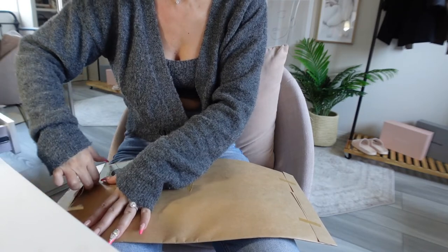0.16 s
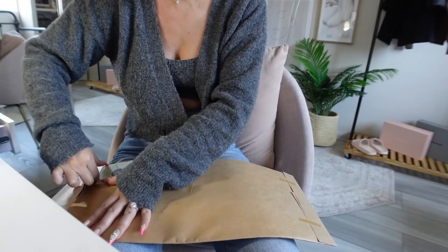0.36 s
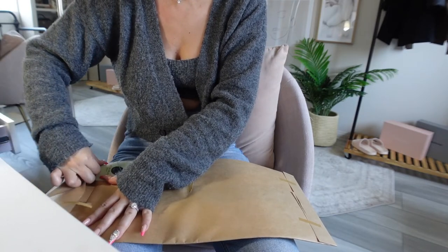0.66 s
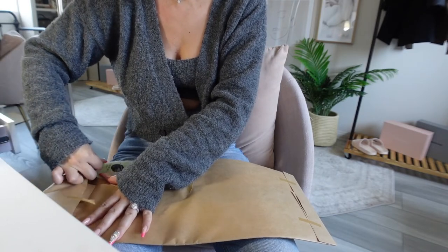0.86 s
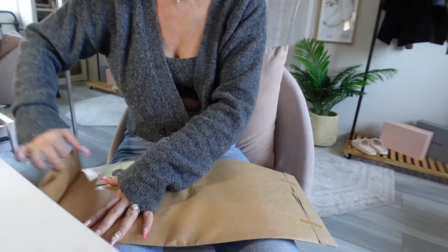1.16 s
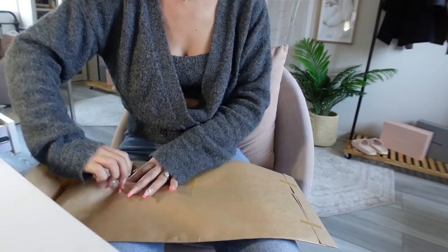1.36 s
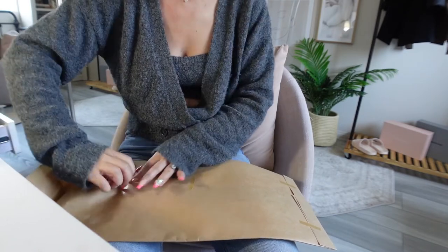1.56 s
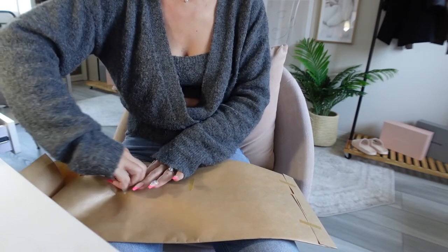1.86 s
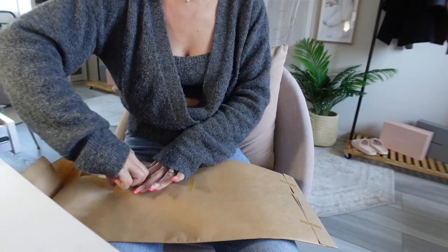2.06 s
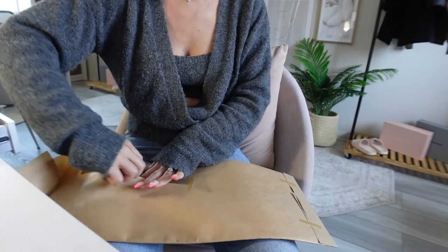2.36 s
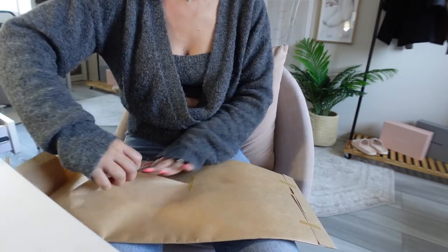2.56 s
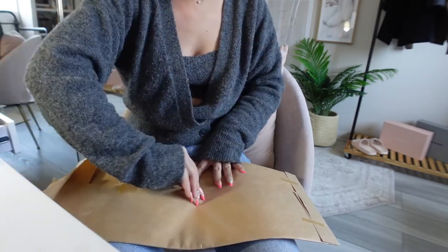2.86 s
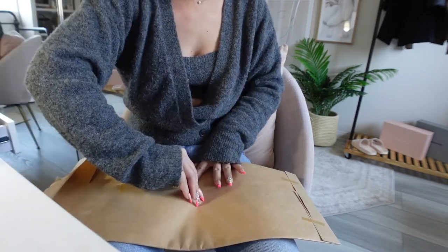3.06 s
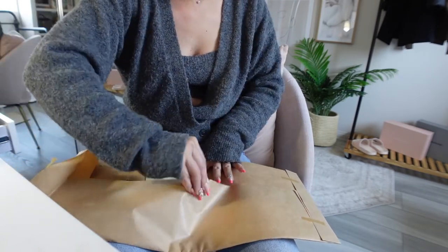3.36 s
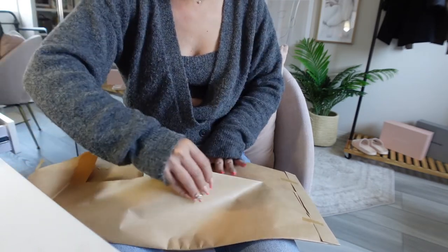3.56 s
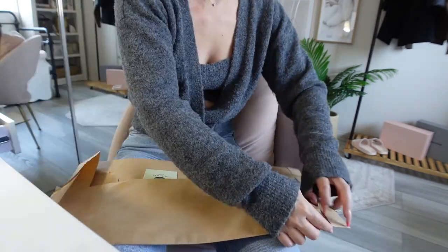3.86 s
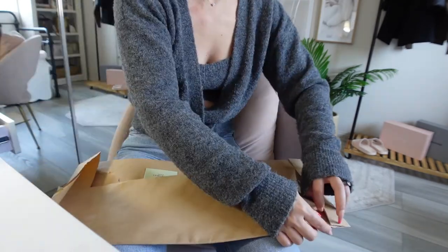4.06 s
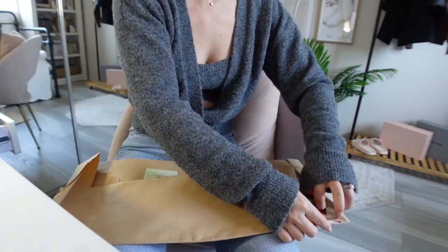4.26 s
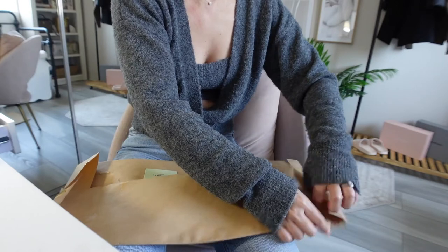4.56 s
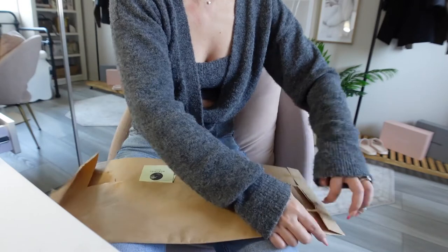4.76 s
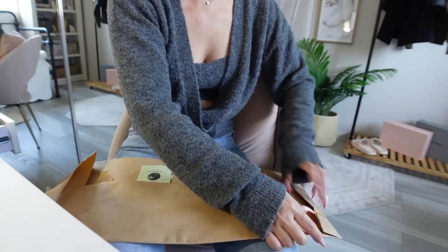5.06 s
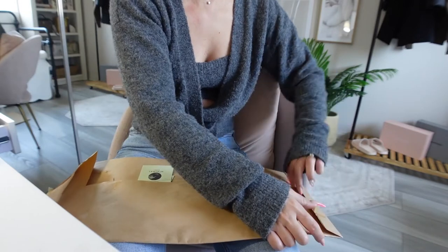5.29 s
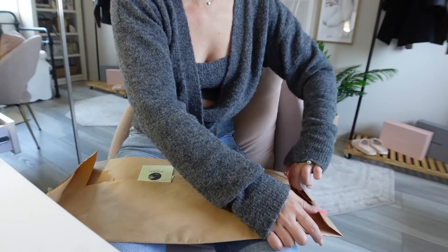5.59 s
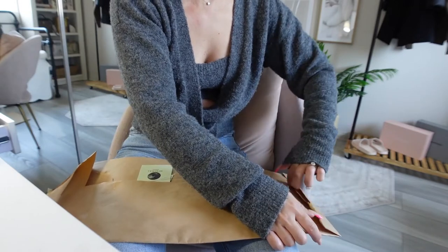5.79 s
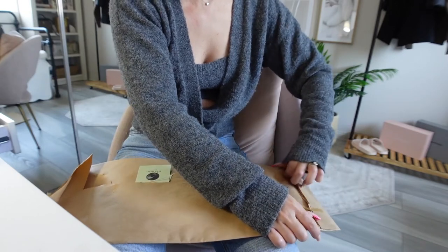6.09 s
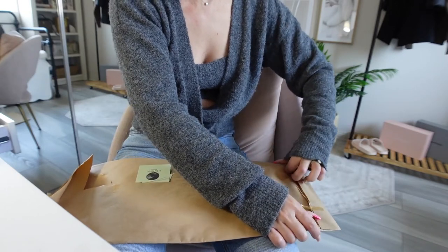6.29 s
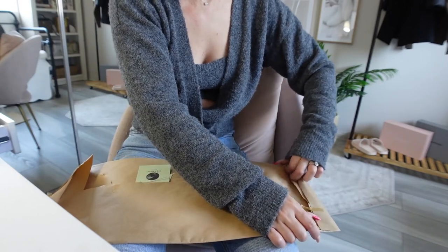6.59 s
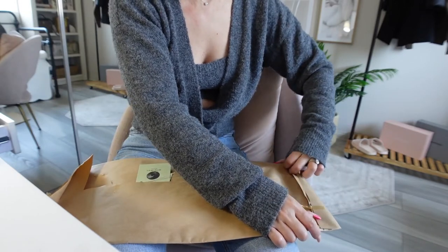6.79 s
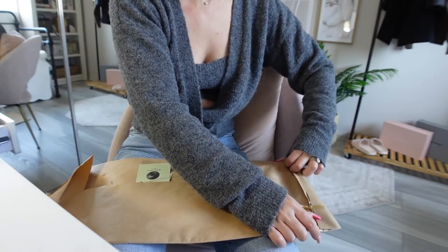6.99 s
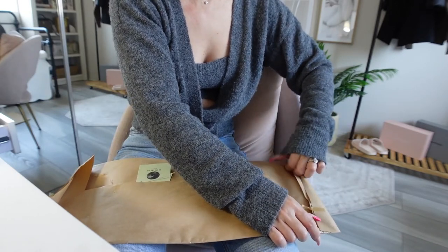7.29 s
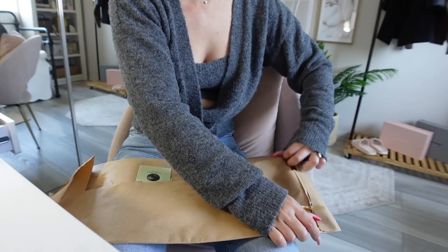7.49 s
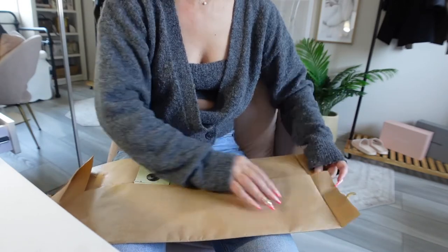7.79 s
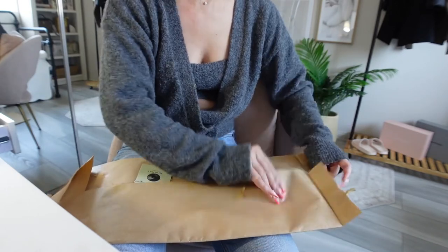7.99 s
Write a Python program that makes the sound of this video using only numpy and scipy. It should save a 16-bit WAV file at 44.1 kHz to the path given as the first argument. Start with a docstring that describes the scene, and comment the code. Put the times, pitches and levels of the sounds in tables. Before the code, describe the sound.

Close stereo pickup of a large stiff paper envelope handled in a small living room. Light creases tick first, then loud snaps and crunchy buckles with a hollow papery body and soft low thumps. The hands shift to the other end, the handling thins almost to quiet, then folding resumes with rubbing, crinkling and crisp snaps to the end. Short room reflections, faint rumble and hiss.

```python
"""A kraft paper mailer on a lap in a small living room, flaps peeled, folded and pressed by hand, in stereo.
First creases snap one by one, then stiff buckles crunch and thump the hollow envelope, among soft low thumps.
Near 3.9 s the hands move to its other end and the ring changes; about 5 s the handling thins out.
From 5.4 s the folding returns, with rubbing and crinkling fibres between snaps, and runs to the end.
Snaps are filtered clicks, rustle is shaped noise; the room answers throughout over faint low rumble and hiss."""
import sys
import numpy as np
from scipy import signal
from scipy.fft import rfft, irfft, next_fast_len
from scipy.io import wavfile
from scipy.ndimage import map_coordinates

SR = 44100
rng = np.random.default_rng(int(sys.argv[2]) if len(sys.argv) > 2 else 0)


def unload_wav(signal):
    """Save mono or channel-first audio to the path in sys.argv[1] as 16-bit WAV at rate SR, clipped to [-1, 1]."""
    wavfile.write(
        sys.argv[1],
        SR,
        np.round(np.clip(np.atleast_2d(signal).T, -1, 1) * 32767).astype(np.int16),
    )


N = 358753  # length in samples

# All levels are relative: each source has its own trims, and the envelope and room add their gains.
# Loud creases snapping: start_s, level_db (over 3 ms), pitch_hz (of the flipping facet),
# brightness (dB per octave above 2 kHz)
CREASE_SNAPS = [(0.181, -29.5, 1280, -1), (0.305, -29, 825, 1.5), (0.379, -26.5, 1270, 1),
                (0.419, -30.5, 920, 7.5), (0.737, -29, 1330, -1), (0.781, -23, 1310, 8),
                (0.839, -22.5, 1060, -15), (0.954, -14, 1280, 8.5), (1.101, -16.5, 1180, 9),
                (1.376, -18.5, 953, 4.5), (1.498, -23, 1510, -2), (1.585, -20, 1135, 0.5),
                (1.618, -20, 1310, 2.5), (1.841, -31, 1290, 1), (2.034, -29, 1260, 5),
                (2.077, -25, 1350, -9), (2.125, -13, 4100, -3), (2.199, -16.5, 1670, 3),
                (2.312, -17.5, 1540, -3), (2.532, -22.5, 1240, 5), (2.695, -19, 6350, 14.5),
                (2.823, -21, 1840, 5.5), (2.846, -22.5, 1810, 11), (2.908, -27.5, 1480, 4.5),
                (2.925, -31, 1730, 1), (2.984, -18.5, 1330, 5.5), (3.116, -28, 940, -1.5),
                (3.175, -16, 870, 7.5), (3.28, -23, 890, 5), (3.3, -19.5, 1360, -3.5),
                (3.463, -17.5, 990, 10), (3.48, -19, 1400, 7), (3.977, -27.5, 1460, 5.5),
                (4.068, -24, 2110, -5), (4.08, -19, 3830, -4), (4.101, -17.5, 2350, 6.5),
                (4.24, -28, 1690, 4), (4.309, -27.5, 1460, 1.5), (4.43, -24, 1160, -2),
                (4.832, -35.5, 1700, -1), (5.219, -40, 1650, 3.5), (5.458, -26.5, 725, 4.5),
                (5.595, -24.5, 880, 1), (5.662, -20.5, 4700, 1), (5.735, -26.5, 2970, 0),
                (5.789, -28.5, 1280, 4.5), (5.879, -23.5, 1180, 5), (5.93, -26, 1260, 4),
                (6.013, -22, 1960, 7), (6.036, -19, 1360, 2), (6.121, -17.5, 1530, 5),
                (6.155, -20, 1420, -4), (6.251, -25.5, 1450, 0), (6.385, -33, 1070, -18),
                (6.409, -32, 940, 1), (6.535, -28, 1410, -3), (6.592, -19.5, 1330, 7),
                (6.688, -25, 1050, -5), (6.726, -17.5, 1030, 9), (6.89, -31.5, 1000, -8),
                (6.959, -31.5, 1460, -11), (6.989, -24, 2110, 2), (7.012, -22.5, 1390, -1),
                (7.044, -21.5, 1130, -0.5), (7.089, -19.5, 1940, 6.5), (7.136, -20.5, 2010, -3),
                (7.334, -16, 1290, -3.5), (7.411, -27, 1230, -1), (7.445, -18.5, 1020, 3),
                (7.483, -17.5, 1230, -2), (7.541, -16, 1270, 1.5), (7.555, -11.5, 1450, -3.5),
                (7.869, -26.5, 890, 3.5), (7.948, -18.5, 4370, 0), (8.062, -18, 1500, -13)]
# The sheet buckling: start_s, level_db (whole buckle), hollow_db (thump within it), duration_s
SHEET_BUCKLES = [(0.835, -9, -22, 0.01), (0.951, -5, -26, 0.031), (1.071, -8, -26, 0.038),
                 (1.095, -1.5, -32.5, 0.016), (2.236, -4, -39.5, 0.06), (2.367, -10, -25.5, 0.025),
                 (2.53, -8.5, -46, 0.022), (3.172, -7.5, -34, 0.073), (3.234, -8.5, -26, 0.026),
                 (3.3, -16, -23.5, 0.061), (3.4, -13.5, -19, 0.015), (3.552, 2, -30, 0.0084),
                 (4.548, -8, -27.5, 0.061), (4.581, -5.5, -35.5, 0.046), (5.222, -32.5, -13.5, 0.018),
                 (5.267, -22, -41, 0.028), (5.988, -20, -16.5, 0.0091), (6.119, -12, -37, 0.024),
                 (6.586, -13.5, -19.5, 0.0087), (6.719, -7, -37, 0.018), (7.31, -9, -27, 0.025),
                 (7.559, -4.5, -36, 0.062), (8.062, -1.5, -35, 0.025)]
# Strokes of the hands, the first two long light holds: start_s, length_s, rubbing_db, crinkling_db
HAND_STROKES = [(-0.05, 4.6, -61, -56), (5.42, 2.75, -61, -57), (-0.05, 0.05, -43, -33),
                (0.16, 0.05, -48, -48), (0.3, 0.3, -48, -47), (0.75, 0.17, -45, -45),
                (0.97, 0.18, -40, -35), (1.17, 0.5, -46, -48), (1.7, 0.17, -41, -47),
                (1.99, 0.32, -42, -37), (2.31, 0.26, -40, -48), (2.62, 0.4, -50, -46),
                (3.385, 0.1, -36, -50), (3.48, 0.14, -35, -33), (3.98, 0.3, -47, -44),
                (4.42, 0.06, -45, -55), (4.56, 0.11, -39, -37), (4.9, 0.3, -62, -65),
                (5.22, 0.14, -54, -56), (5.47, 0.38, -52, -49), (5.89, 0.35, -43, -41),
                (6.33, 0.22, -48, -48), (6.55, 0.22, -41, -40), (6.8, 0.17, -49, -52),
                (6.99, 0.16, -41, -45), (7.27, 0.04, -50, -52), (7.31, 0.22, -42, -43),
                (7.53, 0.11, -34, -34), (7.86, 0.08, -47, -43), (7.95, 0.18, -36, -29)]
# Soft low thumps: start_s, level_db
SOFT_THUMPS = [(0.837, -53), (1.1, -38), (2.28, -52), (3.175, -46), (3.7, -55.5), (4.552, -51), (7.56, -52)]
# Where the hands are: time_s, left_minus_right_db
HAND_PLACE = [(0, 1.5), (2.6, -1), (3.6, -1), (3.9, -3), (5.5, -3.5), (8.1, -2.5)]

# Colour of a snapping crease: frequency_hz, level_db
SNAP_COLOUR = [(300, 6.5), (1000, 3.5), (2500, 7.5), (4000, 6.5), (6000, 1.5), (8000, -6), (11000, -15),
               (15000, -33.5)]
# Colour of the slips in a buckle: frequency_hz, level_db (per Hz)
BUCKLE_COLOUR = [(100, -34.5), (400, -12.5), (700, -6.5), (1100, -0.5), (1800, 4.5), (3000, 1.5),
                 (4500, 0.5), (7000, -6.5), (10000, -15.5), (15000, -32)]
# Colour of crinkling fibres: frequency_hz, level_db (per Hz)
FIBRE_COLOUR = [(100, -98), (600, -12.5), (1500, -5), (3000, -0.5), (4500, 1.5), (7000, -3), (10000, -11),
                (15000, -27)]
# Colour of fingers sliding over paper: frequency_hz, level_db (per Hz)
SLIDE_COLOUR = [(100, -65.5), (500, -9.5), (1000, -11.5), (1700, 5.5), (2400, -1.5), (3500, -2),
                (6000, -15.5), (10000, -20), (16000, -45)]
# Colour of the whole sheet flexing: frequency_hz, level_db (per Hz)
FLEX_COLOUR = [(25, -38), (70, -33), (120, -7.5), (190, 0), (280, 9), (450, 4), (700, 1.5), (1200, -19.5),
               (3000, -41)]
# Colour of a soft low thump: frequency_hz, level_db (per Hz)
THUMP_COLOUR = [(25, -18), (60, -18), (120, -5), (170, -2), (300, -19), (1000, -48), (4000, -80)]
# Colour of the quiet room: frequency_hz, level_db (per Hz)
AIR_COLOUR = [(25, -0.5), (58, -10), (80, -23), (100, 2), (150, 5), (220, 4.5), (600, -9), (1500, -28),
              (4500, 0), (9000, -7.5), (15000, -20)]

# Resonances of the envelope: centre_hz, width_hz, gain_db
ENVELOPE_MODES = [(281, 10, 3), (323.5, 30, 4), (398, 22, 6.5), (466, 29, 7.5), (860, 220, 3),
                  (1000, 32, 0.5), (1644, 32, 2), (2385, 23, 1.5)]
# Resonances added when it is held at the far end: centre_hz, width_hz, gain_db
FAR_END_MODES = [(366, 67, 0), (463, 35, 3)]
# Low modes of the room: centre_hz, width_hz, gain_db
ROOM_MODES = [(107, 14, 4), (135, 20, 7)]
# Decay of the room: frequency_hz, t60_s
ROOM_DECAY = [(150, 0.31), (600, 0.44), (1500, 0.3), (4000, 0.33), (9000, 0.29), (15000, 0.44)]
# Likeness of the room's sound at the two microphones: frequency_hz, likeness (0 to 1)
MIC_LIKENESS = [(100, 1), (700, 0.76), (1800, 0.82), (4000, 0.61), (8000, 0.3), (15000, 0.6)]
# Nearby surfaces, table and floor: delay_s (after the direct sound), level_db
REFLECTIONS = [(.0082, -29), (0.012, -18.5), (0.0204, -36), (0.022, -15.5)]

SMEAR_S, SMEAR_PER_DB = 0.001099, 0.05  # how long a -20 dB crease takes to flip; weak ones are slower
STROKE_ATTACK_S, STROKE_RELEASE_S = 0.0047, 0.039  # a stroke takes hold quickly, lets go more slowly
# fibres settle after a snap, more after a bright one (dB for each dB per octave)
WAKE_DB, WAKE_S, WAKE_PER_BRIGHTNESS_DB = -14.5, 0.02, 0.4
SWAY_DB, SWAY_S = -21, 0.08  # the sheet sways on after a buckle
SMALL_CREASES_PER_S, SMALL_CREASE_HZ = 22, 1410  # the pitch is the middle of their spread
REGRIP_S = 3.9  # the hands move to the other end of the envelope
TOP_HZ = 16000  # band limit of the recorder


def snap(pitch_hz, brightness, smear, size=2048):
    """One crease flipping: a click that peaks at its facet's pitch and radiates little below it."""
    hz = np.fft.rfftfreq(size, 1 / SR)
    u = hz / pitch_hz
    facet = u ** 2 / (1 - u ** 2 + 1j * u / 2.2)
    octaves_up = np.log2(np.maximum(hz / 2000, 1))
    gain = amp(along(SNAP_COLOUR, hz) + brightness * octaves_up)
    # frequencies leave the sheet at slightly different times
    delay = smear * np.abs(map_coordinates(rng.standard_normal(80), [hz / 300]))
    phase = 2 * np.pi * np.cumsum(delay) * SR / size
    click = irfft(facet * gain * np.exp(-1j * phase))
    return np.roll(click, 16)[:size // 2]


def sized(click, db):
    """The click scaled so that its energy, spread over 3 ms, has the given level."""
    return amp(db) * click / np.sqrt(np.sum(click ** 2) / (.003 * SR))


def creases(direct_db=.5, outward_db=-.5):
    """Snaps as (stereo direct sound, sound sent into the room); a facet beams its own colour at each mic."""
    direct, outward = np.zeros((2, N)), np.zeros(N)
    knots = np.geomspace(700, 14000, 14)
    for s, db, pitch_hz, brightness in CREASE_SNAPS:
        smear = SMEAR_S * np.exp(.2 * rng.standard_normal() - SMEAR_PER_DB * (db + 20))
        click = snap(pitch_hz, brightness, smear)
        add(outward, s, sized(click, db + outward_db))
        facet = 2.5 * rng.standard_normal(len(knots))
        for channel in direct:
            # short waves differ most between the microphones
            beam = facet + 3 * np.sqrt(knots / 6000) * rng.standard_normal(len(knots))
            points = np.transpose([knots, beam])
            tinted = coloured(click, lambda hz: along(points, hz), size=512)
            add(channel, s, sized(tinted, db + direct_db))
    return direct, outward


def buckles(crunch_db=-15, thump_db=-9, attack=0.0012, tightness=0.7):
    """A buckle runs through the sheet as a cascade of slips and pumps the air inside the envelope."""
    track, t = np.zeros(N), np.arange(SR // 4) / SR
    for s, db, hollow_db, duration in SHEET_BUCKLES:
        cascade = (1 - np.exp(-t / attack)) * np.exp(-(t / max(duration, .004)) ** 2)
        grains = crackle(len(t), rate=1100, scatter_db=3.5, life=.0008)
        # a tight buckle moves little air and sounds brighter
        tilt = [(1500, 0), (4000, -tightness * (hollow_db + 29.5))]
        slips = coloured(grains, lambda hz: along(BUCKLE_COLOUR, hz) + along(tilt, hz))
        push = coloured(rng.standard_normal(len(t)), lambda hz: along(FLEX_COLOUR, hz))
        crunch = amp(crunch_db) * unit(slips)
        thump = amp(hollow_db + thump_db) * unit(push)
        add(track, s, amp(db) * cascade * (crunch + thump))
    return track


def handling(rub_db=1, pop_db=-1, crinkle_db=0.5, flex_db=-21, small_db=-3, uneven_db=5.0):
    """Fingers rub and dimple the paper, bending crinkles its fibres and the whole sheet flexes."""
    rubbing, bending = effort()
    wake = fading([(s, db + WAKE_DB + WAKE_PER_BRIGHTNESS_DB * bright)
                   for s, db, _, bright in CREASE_SNAPS], WAKE_S)
    sway = fading([(s, db + hollow_db + SWAY_DB) for s, db, hollow_db, _ in SHEET_BUCKLES], SWAY_S)

    grit = crackle(N, rate=900, scatter_db=4.5, life=.001)
    slide = unit(coloured(grit, lambda hz: along(SLIDE_COLOUR, hz)))
    sticking = unit(amp(uneven_db * wobble(45)))  # fingers catch and slip
    dimples = pops(rate=95, pitch_hz=1750, life=.001, scatter_db=3)
    # dimples are too small to radiate bass
    dimples = unit(coloured(dimples, lambda hz: along([(30, -50), (900, 0)], hz)))
    contact = amp(rub_db) * sticking * slide + amp(pop_db) * dimples
    rub = rubbing * (contact + amp(small_db) * small_creases())

    ticks = crackle(N, rate=420, scatter_db=5, life=0.00095)
    crinkle = unit(coloured(ticks, lambda hz: along(FIBRE_COLOUR, hz)))
    crinkling = amp(crinkle_db) * np.sqrt(bending ** 2 + wake)

    tugs = crackle(N, rate=390, scatter_db=6.5, life=0.0017)
    flex = unit(coloured(tugs, lambda hz: along(FLEX_COLOUR, hz)))
    # harder rubbing drags the sheet along
    flexing = np.sqrt((amp(flex_db) * rubbing) ** 2 + sway)
    return rub + crinkling * crinkle + flexing * flex


def effort():
    """Gains of rubbing and of crinkling: each stroke rises, holds and dies away."""
    power = np.zeros((2, N))
    for s, length, *levels in HAND_STROKES:
        t = np.arange(int((length + .5) * SR)) / SR
        release = np.exp(-np.maximum(t - length, 0) / STROKE_RELEASE_S)
        shape = (1 - np.exp(-t / STROKE_ATTACK_S)) * release
        already_past = max(round(-s * SR), 0)  # samples of a stroke begun before time zero
        for track, db in zip(power, levels):
            add(track, s, (amp(db) * shape[already_past:]) ** 2)
    return np.sqrt(power)


def fading(hits, life):
    """Power that jumps at each (s, dB) hit; its amplitude decays with time constant life (s)."""
    s, db = np.transpose(hits)
    places = np.clip(np.round(s * SR).astype(int), 0, N - 1)
    jumps = np.bincount(places, amp(db) ** 2, N)
    return np.abs(signal.lfilter([1], [1, -np.exp(-2 / (life * SR))], jumps))


def crackle(count, rate, scatter_db, life):
    """Random tiny fibre slips, rate a second: noise bursts of unequal size, each with decay constant life (s)."""
    sizes = amp(scatter_db * np.minimum(rng.standard_normal(count), 2))
    slips = sizes * (rng.random(count) < rate / SR)
    power = signal.lfilter([1], [1, -np.exp(-2 / (life * SR))], slips ** 2)
    return unit(np.sqrt(np.abs(power)) * rng.standard_normal(count))


def pops(rate, pitch_hz, life, scatter_db=5):
    """Small dimples popping through at random, each with a brief ring at its own pitch."""
    rows = rng.standard_normal((int(rate * N / SR), 3))
    t = np.arange(512) / SR
    hz = np.clip(pitch_hz * np.exp(.4 * rows[:, :1]), 600, 8000)
    sizes = amp(scatter_db * np.minimum(rows[:, 1:2], 2))
    direction = np.sign(rows[:, 2:])  # a dimple pops in or out
    rings = direction * sizes * np.sin(2 * np.pi * hz * t) * np.exp(-t / life)
    starts = rng.integers(0, N, (len(rows), 1))
    places = starts + np.arange(len(t))
    return unit(np.bincount(places.ravel(), rings.ravel(), N)[:N])


def small_creases(scatter_db=2, brightness=-1):
    """Little facets flip at random moments, each at its own pitch."""
    track = np.zeros(N)
    rows = rng.random((int(SMALL_CREASES_PER_S * N / SR), 4))
    for when, *chance in rows:
        pitch, size, tilt = 2 * np.array(chance) - 1
        click = snap(SMALL_CREASE_HZ * 1.5 ** pitch, brightness + 4 * tilt, smear=2 * SMEAR_S)
        add(track, when * N / SR, amp(scatter_db * size) * unit(click))
    return unit(track)


def soft_thumps(attack=0.0022, life=0.016):
    """Soft low thumps: short pushes of low noise that rise fast and die away."""
    track, t = np.zeros(N), np.arange(SR // 4) / SR
    for s, db in SOFT_THUMPS:
        noise = coloured(rng.standard_normal(len(t)), lambda hz: along(THUMP_COLOUR, hz))
        push = noise * (1 - np.exp(-t / attack)) * np.exp(-t / life)
        add(track, s, amp(db) * unit(push) * np.sqrt(life / 2 / t[-1]))
    return track


def ring(x):
    """The envelope's resonances, with half the room's boom in dB; they shift once it is held at the far end."""
    near = coloured(x, lambda hz: bumps(ENVELOPE_MODES, hz) + bumps(ROOM_MODES, hz) / 2)
    moved = np.clip((np.arange(N) / SR - REGRIP_S) * 10, 0, 1)  # the move takes 0.1 s
    far = coloured(near * moved, lambda hz: bumps(FAR_END_MODES, hz))
    return near * (1 - moved) + far


def room(x, tail_db=-0.5, count=8):
    """Sound leaves from ever different spots of the sheet, and each spot has its own reflections."""
    shares = np.sinh(2 * np.array([wobble(45) for spot in range(count)]))
    shares /= np.sqrt(np.sum(shares ** 2, axis=0))
    out = np.zeros((2, N))
    for share in shares:
        answer = amp(tail_db) * room_tail()
        for delay, db in REFLECTIONS:
            answer[:, round(delay * SR * rng.uniform(.9, 1.1))] += amp(db)
        out += signal.fftconvolve((share * x)[None], answer, axes=1)[:, :N]
    return out


def room_tail(onset=0.001):
    """A diffuse stereo tail of energy 1 per channel on average; each frequency dies at its own speed."""
    hz, t, z = signal.stft(rng.standard_normal((2, SR // 2)), SR, nperseg=256)
    decay = amp(-60 * t / along(ROOM_DECAY, hz)[:, None])
    tail = signal.istft(z * decay, SR, nperseg=256)[1]
    tail = spread(*tail)
    tail = tail * (1 - np.exp(-(np.arange(tail.shape[1]) / SR / onset) ** 2))
    return tail / np.sqrt(np.sum(tail ** 2) / 2)


def air(level_db=-59):
    """The quiet room: noise as a rumble in its low modes, with faint hiss."""
    shape = lambda hz: along(AIR_COLOUR, hz) + bumps(ROOM_MODES, hz)
    noises = [coloured(rng.standard_normal(N), shape) for channel in range(2)]
    return amp(level_db) * unit(spread(*noises))


def spread(a, b):
    """Two unrelated signals become a stereo pair, alike in the bass and further apart in the treble."""
    hz = np.fft.rfftfreq(len(a), 1 / SR)
    turn = np.arccos(np.clip(along(MIC_LIKENESS, hz), 0, 1)) / 2
    mid = irfft(rfft(a) * np.cos(turn), len(a))
    side = irfft(rfft(b) * np.sin(turn), len(a))
    return np.array([mid + side, mid - side])


def bumps(modes, hz):
    """Gain in dB of a few (Hz, width, dB) resonances."""
    return sum(db / (1 + (2 * (hz - centre) / width) ** 2) for centre, width, db in modes)


def coloured(x, shape, size=8192):
    """x through a causal minimum-phase filter whose gain in dB is shape(Hz)."""
    cepstrum = irfft(np.log(amp(shape(np.fft.rfftfreq(size, 1 / SR))) + 1e-6))
    # folding the cepstrum onto positive time makes the filter causal
    cepstrum[1:size // 2] *= 2
    cepstrum[size // 2 + 1:] = 0
    return signal.fftconvolve(x, irfft(np.exp(rfft(cepstrum))))[:len(x)]


def along(points, hz):
    """(Hz, value) points read on a log frequency axis."""
    f, v = np.transpose(points)
    return np.interp(np.log(hz + 1), np.log(f + 1), v)


def wobble(rate):
    """A smooth random curve, rate knots a second."""
    knots = rng.standard_normal(int(N * rate / SR) + 4)
    return map_coordinates(knots, [np.arange(N) * rate / SR])


def amp(db):
    """Decibels to gain."""
    return 10 ** (np.asarray(db) / 20)


def unit(x):
    """The same signal at rms 1."""
    return x / np.sqrt(np.mean(x ** 2) + 1e-20)


def add(track, s, sound):
    """Mix a sound into the track at time s."""
    room_left = track[max(round(s * SR), 0):][:len(sound)]
    room_left += sound[:len(room_left)]


def scene():
    """All paper sounds and thumps ring the envelope, and reach the microphones directly and through the room."""
    snaps, outward = creases()
    rustle = buckles() + handling() + soft_thumps()
    place_s, place_db = np.transpose(HAND_PLACE)
    side_db = np.interp(np.arange(N) / SR, place_s, place_db)
    sides = np.array([side_db, -side_db]) / 2
    direct = np.array([ring(channel + rustle) for channel in snaps])
    # the room's answer leans only slightly towards the hands
    answer = room(ring(outward + rustle)) * amp(0.13 * sides)
    return direct * amp(sides) + answer + air()


def record(dry, ceiling=0.52):
    """The recorder cuts the deep bass, rounds off the highest peaks and keeps nothing above its band limit."""
    cut = signal.sosfilt(signal.butter(2, 50, "high", fs=SR, output="sos"), dry)
    rounded = cut / (1 + np.abs(cut / ceiling) ** 4) ** (1 / 4)
    size = next_fast_len(N + SR // 4)
    in_band = np.fft.rfftfreq(size, 1 / SR) < TOP_HZ
    return irfft(rfft(rounded, size) * in_band, size)[:, :N]


dry = scene()
out = record(dry)
unload_wav(out)
```